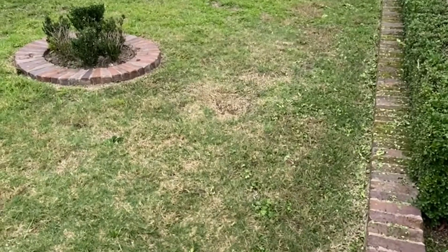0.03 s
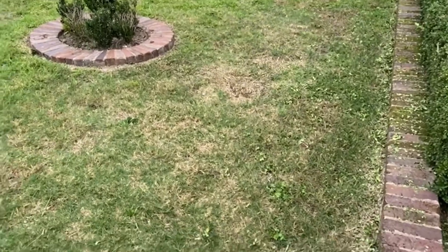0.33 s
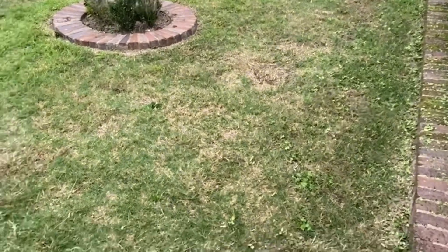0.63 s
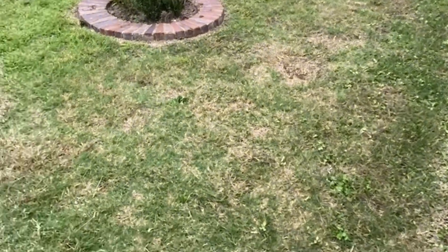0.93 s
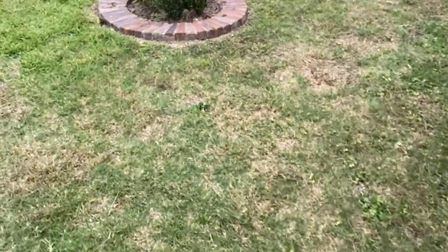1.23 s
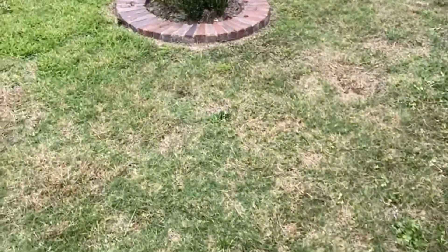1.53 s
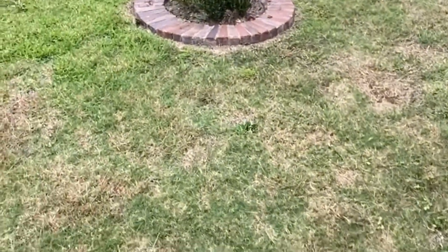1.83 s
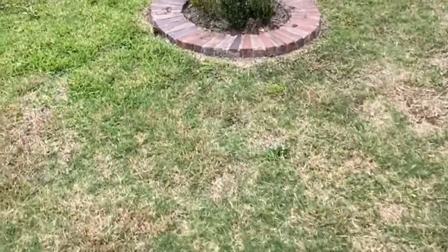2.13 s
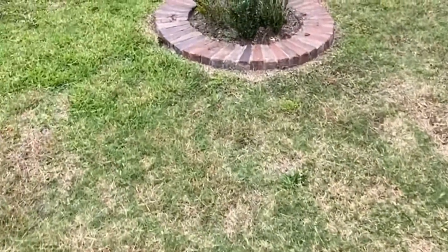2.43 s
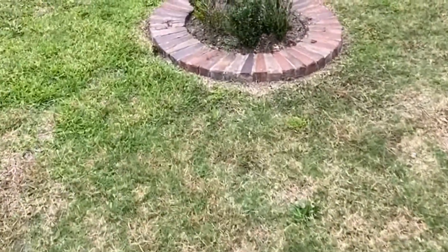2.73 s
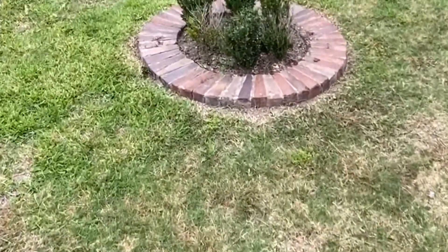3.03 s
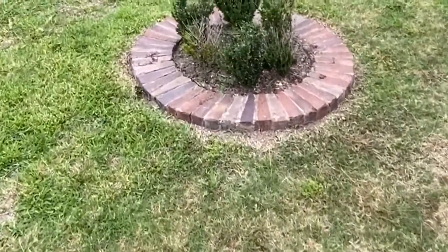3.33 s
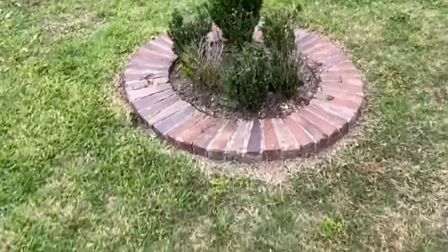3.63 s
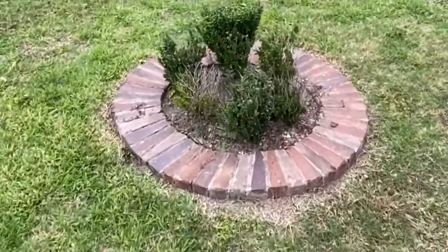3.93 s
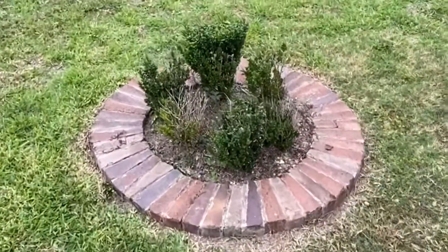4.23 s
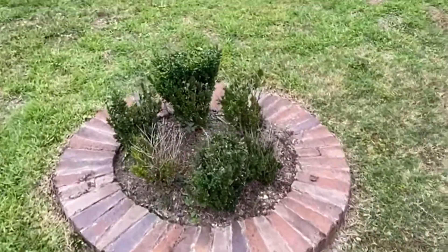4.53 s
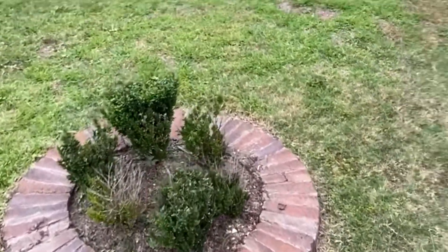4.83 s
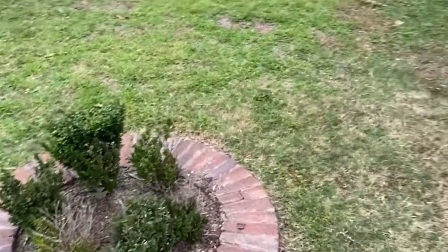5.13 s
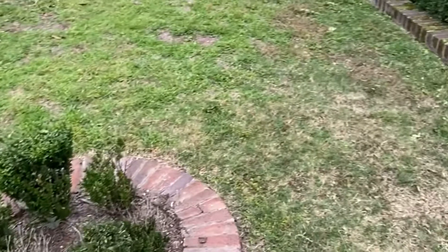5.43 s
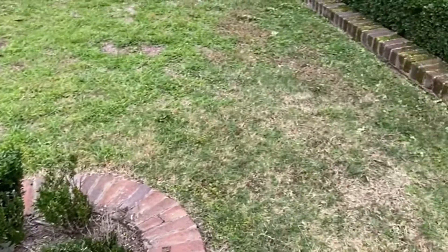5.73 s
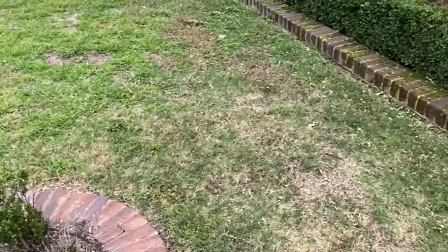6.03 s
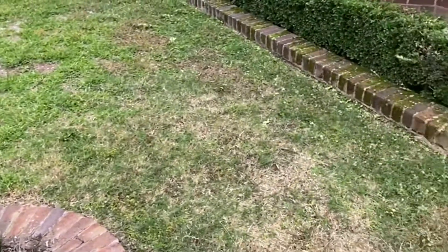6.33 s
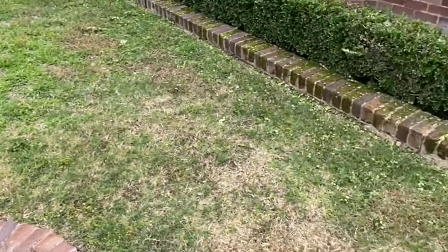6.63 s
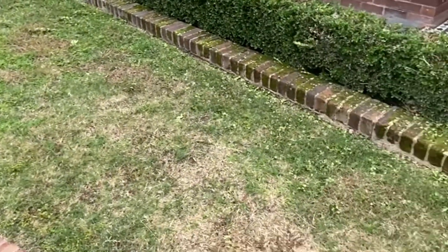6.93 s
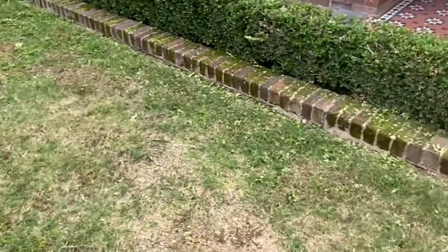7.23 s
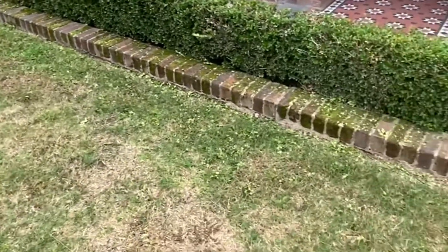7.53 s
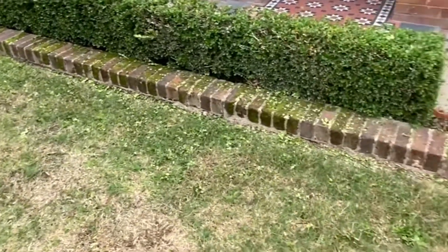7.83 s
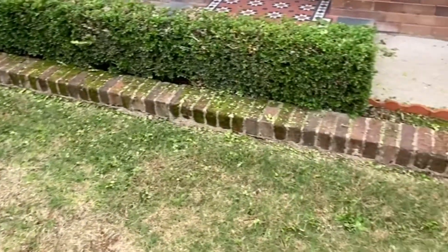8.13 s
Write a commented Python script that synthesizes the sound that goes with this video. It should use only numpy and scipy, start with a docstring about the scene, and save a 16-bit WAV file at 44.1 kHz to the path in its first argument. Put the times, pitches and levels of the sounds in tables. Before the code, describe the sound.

Quiet steps on a lawn with small snaps and knocks, as an engine hums and a car's rumble and tyre roar grow.

```python
"""A car pulls up the road, heard from a front lawn on a phone carried at a stroll: its exhaust boom
rises in pitch, and its tyre roar and body rumble swell as it nears. Out in the street a standing
engine idles with a low hum. Close to the microphone, grass and clothes rustle with the steps, among
soft footfalls, dry snaps of stalks and dull knocks. Far traffic washes behind it all, and a house
front returns a short echo of the road."""
import sys
import numpy as np
from scipy import signal
from scipy.fft import rfft, irfft, next_fast_len
from scipy.io import wavfile
from scipy.ndimage import uniform_filter1d

SR = 44100
rng = np.random.default_rng(int(sys.argv[2]) if len(sys.argv) > 2 else 0)


def wrap_up_sound(samples):
    """Save the sound to the file named by the first command line argument, as 16-bit audio."""
    columns = np.atleast_2d(samples).T
    # keep every value between -1 and 1, then stretch to whole-number steps
    tamed = np.clip(columns, -1, 1)
    steps = np.round(tamed * 32767).astype(np.int16)
    wavfile.write(sys.argv[1], SR, steps)


N = 366030
TIME = np.arange(N) / SR
SIZE = next_fast_len(N + 4096)  # FFT length


# the car gathers speed evenly, then levels off: t/s, firing rate f/Hz
CAR_REVS = [(3.9, 42.5), (5.7, 50.36), (6.15, 52.7), (6.65, 55.48), (7.45, 57.84), (7.7, 56.68),
            (8.0, 56.2)]
# its tailpipe, heard from the lawn: t/s, boom level/dB, octave level/dB
EXHAUST = [(3.9, -69, -69), (4.2, -44, -57), (4.9, -42.5, -59), (5.5, -44, -60), (6.1, -46, -63),
           (6.45, -40.5, -47), (6.68, -32.5, -57), (7.0, -28, -61), (7.54, -32.5, -56), (7.72, -44.5, -58),
           (8.3, -42.5, -53)]
# brief dips in the boom: t/s, depth/dB, half length/s
BOOM_FADES = [(4.65, -6, 0.13), (5.15, -10, 0.15), (5.78, -2, 0.11), (7.76, -24, 0.052)]
# exhaust overtones: multiple of the firing rate, relative level/dB
EXHAUST_ORDERS = [(3, -8), (4, -2.5), (5, -10.5), (6, -12), (6.5, -8.5), (7, -12.5), (7.5, -13)]
# pipe resonances that the overtones glide through: f/Hz, gain/dB
PIPE_COLOUR = [(115, -2), (138, 3), (146, -9), (151, 5.5), (158, 9), (164, -3), (172, -21), (205, -21),
               (218, -14), (223, 4), (231, 2), (240, -11), (260, 2), (400, -2.5)]
# engine load, heard in the overtones: t/s, gain/dB
ENGINE_LOAD = [(3.9, -6), (5.5, 2), (5.85, 2), (6.6, 1), (7.3, -7), (7.65, -1), (7.92, 8), (8.1, -2),
               (8.3, -8)]
# the car's nearness to the microphone: t/s, relative tyre level/dB, relative body level/dB
CAR_NEARNESS = [(0, -67, -60), (1.1, -62, -54.5), (2.1, -65.5, -57), (2.95, -64, -56), (3.3, -63.5, -53.5),
                (3.9, -62.5, -55), (4.3, -57.5, -54.5), (4.75, -56.5, -56), (5.3, -56.5, -52.5),
                (6.2, -54, -52.5), (6.38, -49.5, -49.5), (6.9, -47, -47.5), (7.3, -51, -48),
                (7.9, -49.5, -48.5), (8.3, -48.5, -48.5)]
BOOM_PAN_DB, BODY_PAN_DB = 1.2, -4  # left minus right

def exhaust():
    """Up the road, the pipe booms at the firing rate; its rising overtones meet resonances in turn."""
    hz, = curves(CAR_REVS)
    boom_db, octave_db = curves(EXHAUST)
    _, body_db = curves(CAR_NEARNESS)
    load_db, = curves(ENGINE_LOAD)
    throttle = np.clip((TIME - EXHAUST[0][0]) / 0.12, 0, 1)
    boom = partials(hz, [(1, 0)], flutter_db=.4, flutter_rate=12) * undb(boom_db + fades(BOOM_FADES))
    octave = partials(hz, [(2, 0.0019)], flutter_db=-3.5, flutter_rate=19) * undb(octave_db)
    orders = partials(hz, EXHAUST_ORDERS, flutter_db=1.6, flutter_rate=10)
    overtones = colour(orders, PIPE_COLOUR) * undb(body_db + load_db)
    return throttle * (boom * pan(BOOM_PAN_DB) + (octave + overtones) * pan(BODY_PAN_DB))


# the car's bearing from the lawn: t/s, side (-1 right to 1 left)
BEARING = [(0, -0.34), (4.2, -0.39), (5.3, 0.76), (6.4, 0.68), (7.1, 0.024), (7.6, -0.59), (8.3, -0.64)]
# tread sings ahead, a hollower roar takes over alongside: t/s, tread level/dB, alongside level/dB
TYRE_VOICES = [(4.3, -67, -87), (4.9, -60.5, -76), (5.2, -52, -80), (5.75, -54, -72), (6.15, -54, -53.5),
               (6.42, -49, -51), (7.15, -53, -56.5), (7.55, -50.5, -47), (7.9, -53.5, -51), (8.3, -57, -52)]
# spectra of body rumble, tyre roar, tread and the roar alongside: f/Hz, relative level/dB
BODY_COLOUR = [(18, -28), (30, -16), (45, 6), (85, 5.5), (110, 0.5), (145, 1.5), (200, -1.5), (235, 1.1),
               (290, -2.5), (350, -8), (480, -13.5), (800, -23), (2000, -63)]
TYRE_COLOUR = [(200, -33), (400, -1.5), (600, 3), (1000, -0.5), (1400, -6), (2000, -5.5), (2600, -18),
               (3400, -20), (4400, -22), (5300, -16), (6400, -31.5), (7500, -38), (10000, -35.5),
               (13000, -58)]
TREAD_COLOUR = [(230, -8.5), (310, 7.5), (360, 1), (470, -2), (700, -22.5), (930, -2.5), (1060, -12),
                (1280, -12), (1450, -10), (1900, -16.5), (2400, -23), (2700, -21.5), (3400, -30.5),
                (6000, -57.5)]
ALONGSIDE_COLOUR = [(170, -16), (225, 4.5), (270, 11.5), (320, -14.5), (440, 6.5), (600, -4.5), (800, -9.5),
                    (1200, -1), (1700, -24), (3600, -28), (5800, -20.5), (8000, -43.5)]

def road_noise():
    """Body rumble and tyre roar swell as the car nears and change colour as it draws level."""
    tyre_db, body_db = curves(CAR_NEARNESS)
    tread_db, alongside_db = curves(TYRE_VOICES)
    bearing, = curves(BEARING)
    body = wash(BODY_COLOUR, bearing) * undb(body_db + 3.0 + 1.2 * waver(14))
    tyres = wash(TYRE_COLOUR, bearing) * undb(tyre_db - 1.7 + .5 * waver(12))
    tread = wash(TREAD_COLOUR, bearing) * undb(tread_db + waver(10))
    alongside = wash(ALONGSIDE_COLOUR, bearing) * undb(alongside_db + 1.1 * waver(10))
    return body * pan(BODY_PAN_DB) + tyres + tread + alongside


# tread blocks singing on the approach: t/s, level/dB
WHINE = [(4.7, -82), (5.15, -64), (5.5, -60), (5.85, -58.5), (6.15, -65), (6.6, -76)]
WHINE_PER_FIRING, WHINE_WIDTH_HZ, WHINE_LEFT_LAG_S = 21.4, 95, .00012

def tread_whine():
    """Tread blocks slap the road in a narrow band of pitch that climbs with the car's speed."""
    firing_hz, = curves(CAR_REVS)
    db, = curves(WHINE)
    phase = 2 * np.pi * np.cumsum(firing_hz * WHINE_PER_FIRING) / SR
    rate = 2 * WHINE_WIDTH_HZ
    whine = (waver(rate) * np.cos(phase) + waver(rate) * np.sin(phase)) * undb(db)
    return np.array([np.interp(TIME - WHINE_LEFT_LAG_S, TIME, whine), whine])


# the engine standing in the street: t/s, firing rate f/Hz, relative level/dB
IDLE = [(0, 122.1, -40.5), (.8, 120.1, -41), (.95, 124.8, -41), (1.4, 128.8, -50.5), (1.65, 126.6, -46),
        (2.1, 124.8, -45.5), (2.45, 124.9, -49.5), (3.1, 127.3, -49.5), (3.38, 129.6, -52.5),
        (3.7, 123.7, -42), (4.05, 124, -39.5), (4.68, 127.2, -41), (5.2, 127.1, -41), (5.45, 123.3, -41.5),
        (5.66, 127.5, -42), (5.9, 123, -40.5), (6.2, 126, -39.5), (6.6, 124.4, -36), (7.25, 126.7, -39.5),
        (8.3, 126, -38.5)]
# brief dips in its hum: t/s, depth/dB, half length/s
HUM_FADES = [(.985, -17, 0.092), (1.45, -20.5, 0.085), (3.33, -9, 0.073), (3.52, -6, 0.034),
             (4.18, -7, 0.058), (4.69, -4.5, 0.077), (5.19, -8, 0.072), (5.65, -2.5, .05), (6.25, -4, 0.03)]
# its overtones wax and wane: t/s, level/dB at each of 1.5, 2 and 3 times the firing rate
IDLE_OVERTONES = [(0, -68, -56.5, -75.5), (.8, -69, -63, -75), (1.3, -66, -65, -74), (1.9, -64, -64.5, -75),
                  (2.7, -64, -66, -65.5), (3.5, -58, -69.5, -75), (4.3, -67.5, -62.5, -71),
                  (5.5, -65.5, -63, -63.5), (6.8, -60, -64, -61), (8.3, -55, -55, -65)]

def idling_engine():
    """Only the low hum and first overtones reach the lawn; uneven firings add a throb an octave down."""
    hz, db = curves(IDLE)
    hz = hz + 0.4 * waver(7)
    db = db + fades(HUM_FADES)
    hum = partials(hz, [(1, 0.013)], flutter_db=0.3, flutter_rate=5.2)
    hum *= undb(db - 1.58 + 0.23 * waver(12))
    throb = partials(hz, [(.5, 0.0076)], flutter_db=2.5, flutter_rate=18)
    throb *= undb(-33 + 0.42 * db)  # follows the hum's level only in part
    overtones = sum(partials(hz, [(k, 0)], flutter_db=1.14, flutter_rate=7.1) * undb(overtone_db)
                    for k, overtone_db in zip((1.5, 2, 3), curves(IDLE_OVERTONES)))
    return (hum + overtones) * pan(-2.5) + throb


# grass and cloth swish as the legs swing: peak t/s, relative level/dB, rise/s, fall/s
SWISHES = [(.17, -92, 0.022, .08), (.48, -87, 0.12, 0.45), (1.43, -82.5, 0.061, 0.054),
           (1.6, -79, 0.095, 0.11), (1.83, -84, 0.18, 0.12), (2.09, -88.5, 0.05, 0.063),
           (2.285, -77.5, 0.062, 0.064), (2.42, -82, 0.13, 0.063), (2.67, -79.5, 0.14, 0.12),
           (2.85, -87, 0.071, 0.085), (3.12, -77.5, 0.081, 0.1), (3.32, -81.5, 0.12, 0.21),
           (3.51, -76, 0.059, 0.089), (3.74, -82.5, 0.31, 0.13), (3.99, -81, 0.12, 0.18),
           (4.2, -79, 0.15, 0.17), (4.62, -87, 0.17, .06), (4.8, -78, 0.059, .06),
           (4.89, -73.5, 0.087, 0.066), (5.04, -85, 0.08, 0.092), (5.55, -82, 0.21, 0.58),
           (6.33, -82.5, 0.12, 0.14), (6.65, -81, .2, .27), (7.42, -77.5, 0.25, 0.17),
           (7.66, -75, 0.09, 0.11), (7.97, -79, .025, 0.044), (8.27, -76, 0.03, .029)]
# soles scuff the grass, feet land, blades squeak on a sole: t/s, level/dB, rise/s, decay/s
SCUFFS = [(.173, -66.5, .003, 0.0084), (.9, -70.5, 0.17, 0.045), (1.892, -62.5, 0.0042, 0.041),
          (3.045, -63, 0.042, 0.094), (3.505, -62, 0.0021, .0043), (4.19, -78, 0.094, .04),
          (8.264, -48, .002, .01)]
FOOTFALLS = [(.8, -56, 0.18, 0.085), (.96, -57, 0.057, 0.04), (1.632, -55, 0.003, 0.016),
             (1.894, -51, 0.0026, 0.015), (3.065, -55, 0.013, 0.05)]
SQUEAKS = [(1.895, -61, 0.0037, 0.0027), (1.904, -60, 0.0027, 0.0023), (2.731, -64, .004, .006)]
# spectra of these four at close range: f/Hz, relative level/dB
RUSTLE_COLOUR = [(400, -23), (1500, -9.5), (3000, 7), (4200, 2), (5400, 13), (6500, 7), (7600, -4.5),
                 (9000, 4.5), (10500, 2), (12000, -1), (13000, -13)]
SCUFF_COLOUR = [(500, -22), (1300, 3.5), (1900, 12), (3100, -5), (4200, 0.5), (5500, 6.5), (6500, -4),
                (7400, -21), (12000, -46)]
FOOTFALL_COLOUR = [(100, -20), (230, -13.5), (310, -4), (430, 2), (620, 0), (790, -2), (1050, -9),
                   (2000, -16), (5500, -35), (9000, -57)]
SQUEAK_COLOUR = [(4500, -35), (5900, -9), (6450, -3), (6900, -8), (7600, -33)]
FLICKS_PER_S, FLICK_DB = 60, -6.5  # single blades springing back; level relative to the grains

def walker():
    """Just below the microphone, grass and cloth rustle in tiny grains; feet scuff, land and squeak."""
    grain_db = -1.5 * np.minimum(rng.exponential(size=N // 32 + 1), 4.5)
    grains = unit(np.repeat(undb(grain_db), 32)[:N])
    flicking = rng.random(N // 16 + 1) < FLICKS_PER_S * 16 / SR
    flicks = unit(np.repeat(flicking, 16)[:N] + 1e-9)
    rustle = wash(RUSTLE_COLOUR, drive=np.hypot(grains, undb(FLICK_DB) * flicks))
    tufts_db = 1.64 * waver(49)  # tufts give way unevenly
    rustle *= undb(swells(SWISHES, rest_db=-101) + 8.0 + tufts_db)
    scuffs = wash(SCUFF_COLOUR, drive=grains * bursts(SCUFFS))
    footfalls = wash(FOOTFALL_COLOUR, drive=bursts(FOOTFALLS))
    squeaks = wash(SQUEAK_COLOUR, drive=bursts(SQUEAKS))
    return rustle + scuffs + footfalls + squeaks


# dry stalks underfoot: t/s, ring level/dB, crack over ring/dB, tilt/(dB per octave), pitch factor,
# lag of the left microphone/s
SNAPS = [(1.5305, -59, 0, 3, 1.22, -.0002), (1.8803, -45, 1, -4.5, .86, -.00007),
         (2.284, -70, 8, 1, 1, .00036), (3.574, -68, 8, 0, 1, .00036), (3.605, -51.5, 2, -2.5, .88, .00036),
         (3.965, -66, 8, -1, 1, .00036), (4.151, -57, 6, 1.5, .86, .00016), (6.262, -57, -9, 2, 1, .00036),
         (6.439, -62, -5, -2, 1, .00036), (6.883, -57, -3, 2, 1.1, .00036),
         (7.4445, -47.5, 5, -3, .92, -.00002), (7.865, -54, -10, 1, 1, .00036),
         (7.954, -63, 10, 5, 1, .00036), (8.2458, -32.5, -6, 1.5, 1, .00037)]
# a stalk's modes: f/Hz at pitch factor 1, relative level/dB, decay/s
STALK_MODES = [(1420, -3, .0011), (1900, 9.5, .0013), (2430, -1, .0013), (3050, 7, .00095),
               (5480, 5, .0012), (6310, -2, .001)]
SNAP_PIVOT_HZ, SNAP_TOP_HZ = 2500, 10500
SNAP_RISE_S, CRACK_DECAY_S = 0.00055, 0.0011

def snaps():
    """A brief crack rings a stalk's short modes; its bearing puts a lag between the two microphones."""
    out = np.zeros((2, N))
    age = TIME[:SR // 50]
    bin_hz = np.fft.rfftfreq(len(age), 1 / SR)
    octaves = np.log2(np.maximum(bin_hz, SNAP_PIVOT_HZ / 2) / SNAP_PIVOT_HZ)
    muffle = 1 / np.hypot(1, (bin_hz / SNAP_TOP_HZ) ** 10)
    attack = np.minimum(age / SNAP_RISE_S, 1)
    for s, db, crack_db, tilt_db, pitch, lag_s in SNAPS:
        ring = np.zeros(len(age))
        for hz, mode_db, decay_s in STALK_MODES:
            phase = 2 * np.pi * hz * pitch * age + rng.uniform(0, 2 * np.pi)
            ring += undb(mode_db) * np.sin(phase) * np.exp(-age / decay_s)
        crack = undb(crack_db) * rng.standard_normal(len(age)) * np.exp(-age / CRACK_DECAY_S)
        spectrum = rfft((ring + crack) * attack)
        snap = irfft(spectrum * undb(db + tilt_db * octaves) * muffle, len(age))
        for channel, arrival_s in enumerate((s + lag_s, s)):
            start = int(arrival_s * SR)
            out[channel, start:start + len(age)] += snap
    return out


# heels on the ground and fingers on the phone: t/s, level/dB, f/Hz, decay/s, left minus right/dB
KNOCKS = [(.998, -46, 314, 0.017, -4), (1.003, -48, 800, 0.011, 0), (1.5295, -50, 647, .003, -2),
          (1.632, -45, 420, .005, 10), (3.114, -51, 760, 0.018, -2), (3.8405, -40.5, 530, 0.0023, 16),
          (4.347, -39.5, 513, 0.0031, 13), (4.4345, -40.5, 630, .003, 6), (4.685, -44, 452, .004, 0),
          (7.445, -35, 1260, 0.0033, 0), (7.4455, -36, 720, .0025, 5)]
KNOCK_RISE_S = 0.00099

def knocks():
    """Each dull knock, near or on the phone, is a few cycles of one heavily damped tone."""
    out = np.zeros((2, N))
    age = TIME[:SR // 10]
    for s, db, hz, decay_s, pan_db in KNOCKS:
        start = int(s * SR)
        envelope = undb(db) * np.minimum(age / KNOCK_RISE_S, 1) * np.exp(-age / decay_s)
        out[:, start:start + len(age)] += envelope * np.sin(2 * np.pi * hz * age) * pan(pan_db)
    return out


# distant roads as they reach the lawn: f/Hz, relative level/dB
TRAFFIC_COLOUR = [(18, -21), (30, -12), (100, 0.5), (200, 1), (400, -4.5), (800, 8), (1150, -5), (2000, -4),
                  (3000, -22), (4200, -12), (5300, -7), (6800, -7), (7600, -23.5), (12000, -39)]
TRAFFIC_DB, WARBLE_DB, WARBLES_PER_S = -75.5, 3.7, 9.2

def far_traffic():
    """A steady wash of far traffic, with an added artificial warble in each third-octave band."""
    spectrum = rfft(wash(TRAFFIC_COLOUR), SIZE)
    bin_hz = np.fft.rfftfreq(SIZE, 1 / SR)
    thirds = 3 * np.log2(np.clip(bin_hz, 400, 6400) / 400)
    bands = (irfft(spectrum * np.maximum(1 - abs(thirds - k), 0), SIZE)[:, :N] for k in range(13))
    return sum(band * undb(TRAFFIC_DB + WARBLE_DB * waver(WARBLES_PER_S)) for band in bands)


def wall_echo(street, echo_db=-11.5):
    """A nearby house front returns the street sound; the lag drifts as the microphone is carried."""
    lag_s = .009 + 0.000726 * waver(.8)
    echo = np.array([np.interp(TIME - lag_s, TIME, channel) for channel in street])
    return (street + undb(echo_db) * echo) / np.hypot(1, undb(echo_db))


# stereo width of the phone's microphones: f/Hz, side minus mid level/dB
MIC_WIDTH = [(50, -12.5), (140, -11), (280, -9.5), (500, -1), (700, 2.5), (1300, 4), (1850, -1),
             (2600, 8.5), (3900, -1.5), (4600, 2), (5400, -9.5), (6800, 3), (7800, 10), (10000, -5.5)]

def wash(points, bearing=0, drive=1):
    """Coloured stereo noise of strength drive; the side's direct share is a quarter cycle out of step."""
    noise = rng.standard_normal((2, N)) * drive
    near, far = rfft(noise, SIZE) * unit(response(points))
    width = response(MIC_WIDTH)
    mid, turned, diffuse = irfft(np.array([near, 1j * near * width, far * width]), SIZE)[:, :N]
    direct = np.clip(bearing, -1, 1)
    side = direct * turned + np.sqrt(1 - direct ** 2) * diffuse
    return np.array([mid + side, mid - side])


def partials(hz, orders, flutter_db, flutter_rate):
    """Engine orders (multiple, level/dB) locked to one crank, each wavering in strength."""
    phase = 2 * np.pi * np.cumsum(hz) / SR
    out = np.zeros(N)
    for multiple, db in orders:
        amplitude = np.sqrt(2) * undb(db + flutter_db * waver(flutter_rate))
        out += amplitude * np.sin(multiple * phase + rng.uniform(0, 2 * np.pi))
    return out


def bursts(table):
    """Envelope of short contacts that rise and die away."""
    out = np.zeros(N)
    for s, db, rise_s, decay_s in table:
        start = int(s * SR)
        age = TIME[:min(N - start, SR // 2)]
        tail = np.exp(-np.maximum(age - rise_s, 0) / decay_s)
        out[start:start + len(age)] += undb(db) * np.minimum(age / rise_s, 1) * tail
    return out


def swells(table, rest_db):
    """Level in dB of bell-shaped swells that add in power over a resting level."""
    power = undb(rest_db) ** 2
    for s, db, rise_s, fall_s in table:
        width_s = np.where(TIME < s, rise_s, fall_s)
        power = power + undb(db) ** 2 * np.exp(-2 * ((TIME - s) / width_s) ** 2)
    return 10 * np.log10(power)


def fades(table):
    """Brief bell-shaped dips in level, in dB."""
    return sum(db * np.exp(-((TIME - s) / half_s) ** 2) for s, db, half_s in table)


def waver(rate):
    """Smooth random motion of rms 1, changing rate times a second."""
    hold = int(SR / rate)
    stairs = np.repeat(rng.standard_normal(N // hold + 1), hold)
    return unit(uniform_filter1d(stairs, hold)[:N])


def curves(table):
    """Each column after the time column as a value per sample."""
    s, *columns = np.transpose(table)
    return [np.interp(TIME, s, column) for column in columns]


def response(points):
    """Gain per frequency bin from (f/Hz, level/dB) points."""
    hz, db = np.transpose(points)
    bin_hz = np.arange(SIZE // 2 + 1) * SR / SIZE
    return undb(np.interp(np.log(bin_hz + 1), np.log(hz), db))


def colour(x, points):
    """Filter by (f/Hz, gain/dB) points."""
    return irfft(rfft(x, SIZE) * response(points), SIZE)[..., :N]


def pan(db):
    """Gains of the two channels for a left minus right level."""
    return undb(np.array([[db], [-db]]) / 2)


def undb(db):
    """Decibels to gain."""
    return 10 ** (np.asarray(db) / 20)


def unit(x):
    """Scale to rms 1."""
    return x / np.sqrt(np.mean(x ** 2))


def scene():
    """From the lawn: engines and road noise out in the street, the walker close by."""
    engines = idling_engine() + exhaust()
    street = wall_echo(road_noise() + tread_whine() + far_traffic())
    close_by = walker() + snaps() + knocks()
    return engines + street + close_by


def record(dry, top_hz=12700):
    """The hand-held phone cuts the top treble steeply."""
    return signal.sosfilt(signal.ellip(8, .2, 70, top_hz, fs=SR, output="sos"), dry)


dry = scene()
out = record(dry)
wrap_up_sound(out)
```